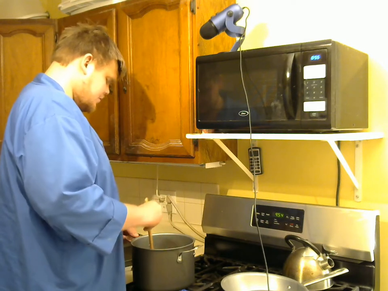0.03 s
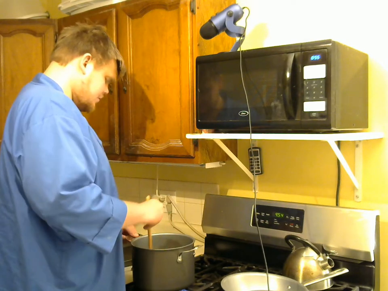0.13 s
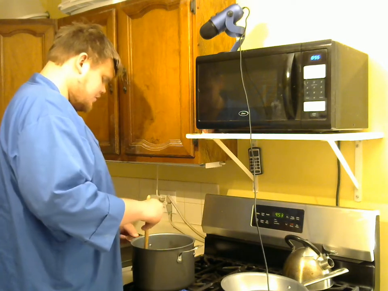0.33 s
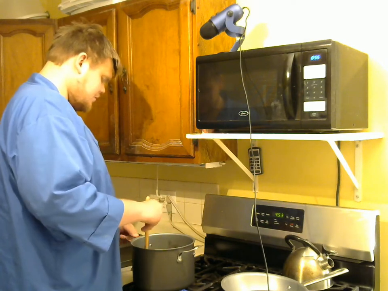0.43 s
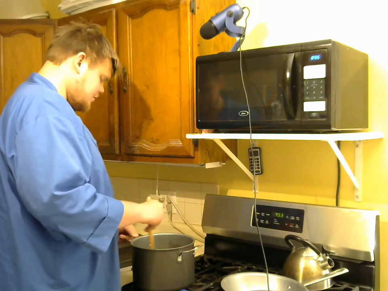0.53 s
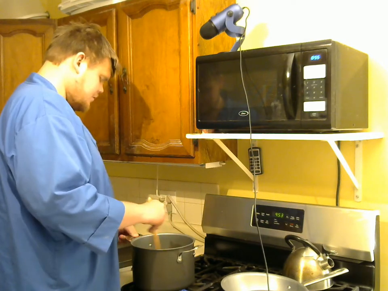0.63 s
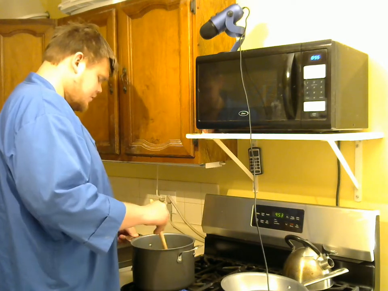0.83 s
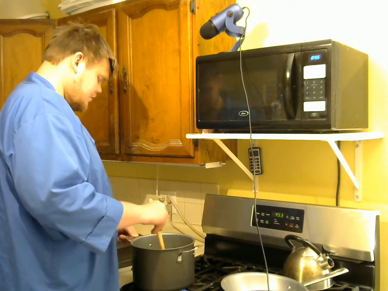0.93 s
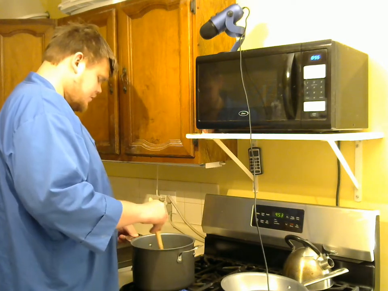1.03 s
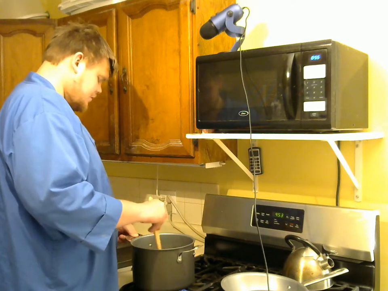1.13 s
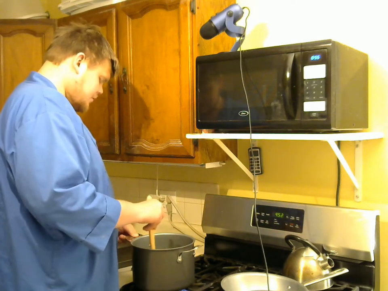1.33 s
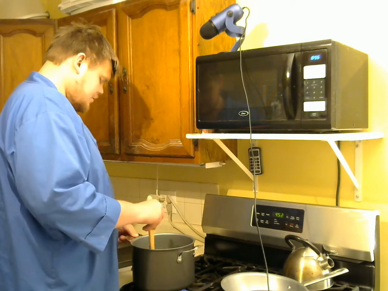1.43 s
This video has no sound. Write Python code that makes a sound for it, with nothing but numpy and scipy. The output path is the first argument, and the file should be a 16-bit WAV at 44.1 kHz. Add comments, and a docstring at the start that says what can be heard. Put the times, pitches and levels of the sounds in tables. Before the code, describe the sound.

One sharp ringing spoon knock on a pot, followed by hollow, juddering stirring scrapes in a kitchen

```python
"""A low hum is heard first, then one hard knock of a wooden spoon on a metal pot, with two softer knocks later.
Decaying tones ring the pot, and noise adds a crack and a clatter. The dragged spoon judders in hollow bumps
while random clicks, filtered and echoed, make it rub, churn and sing. Small wet ticks and grit are shaped noise.
Hard kitchen walls add a short tail; wavering appliance hums, a low tone and soft air noise lie underneath."""
import sys
import numpy as np
from scipy import signal
from scipy.fft import rfft, irfft
from scipy.io import wavfile
from scipy.ndimage import uniform_filter1d

SR = 44100
rng = np.random.default_rng(int(sys.argv[2]) if len(sys.argv) > 2 else 0)


def waveform_to_disk(signal):
    """Save audio, clipped to [-1, 1], as 16-bit WAV at the path in sys.argv[1]."""
    frames = np.transpose(np.atleast_2d(signal))
    scaled = np.clip(frames, -1, 1) * 32767
    samples = np.round(scaled).astype(np.int16)
    wavfile.write(sys.argv[1], SR, samples)


N = 66150
T = np.arange(N) / SR  # time of each sample, in seconds

# Tone colour of the wet ticks and the grit: pitch_hz, density_db [dB per Hz, relative]
TICK_COLOUR = [(500, 6), (2000, -7.5), (3800, 1), (5000, -4), (7600, 1), (10000, -10), (13000, -13),
               (15500, -14)]


def undb(db):
    """Turn decibels into a gain."""
    return 10 ** (np.asarray(db) / 20)


def unit(x):
    """Scale a sound to an average (rms) level of 1."""
    return x / np.sqrt(np.mean(x ** 2))


def curve(rows, axis=1):
    """Join one column of a table by straight lines in time."""
    rows = np.array(rows)
    return np.interp(T, rows[:, 0], rows[:, axis])


def noise():
    """White noise: independent random samples."""
    return rng.standard_normal(N)


def colour(x, points):
    """Weight the frequencies of a sound by (Hz, dB) points, then scale it to rms 1."""
    hz, db = np.array(points).T
    f = np.maximum(np.fft.rfftfreq(N, 1 / SR), 1)
    gain = undb(np.interp(np.log(f), np.log(hz), db))
    return unit(irfft(rfft(x) * gain, N))


def fade(start, t60, rise=0.00034):
    """Rise quickly at the start, then die away by 60 dB every t60 seconds."""
    age = np.maximum(T - start, 0)
    return (1 - np.exp(-age / rise)) * np.exp(-np.log(1000) * age / t60)


def walk(rate):
    """Noise smoothed twice into a slow random drift of rms 1."""
    k = int(SR / rate)
    smooth = uniform_filter1d(noise(), k, mode="wrap")
    return unit(uniform_filter1d(smooth, k, mode="wrap"))


def kitchen(x, wet_db):
    """Direct sound plus a dense, short tail of reflections from the walls."""
    gap_s, room_t60_s = 0.00408, 0.23
    tail = noise() * fade(gap_s, room_t60_s)
    tail = tail / np.linalg.norm(tail)
    return x + undb(wet_db) * signal.fftconvolve(x, tail)[:N]


def slips():
    """The spoon sticks and slips: dense random clicks of uneven size and either sign."""
    slips_per_s, scatter_db = 1500, 2
    happens = rng.random(N) < slips_per_s / SR
    size = undb(scatter_db * np.minimum(rng.exponential(size=N), 4))
    return happens * rng.choice([-1, 1], N) * size


def ringing(hz, width_hz):
    """Slips drive a resonance whose centre follows a pitch curve; rms 1."""
    turn = np.exp(2j * np.pi * np.cumsum(hz) / SR)
    lowpass = signal.butter(2, width_hz / 2, fs=SR, output="sos")
    # Shift the moving centre down to 0 Hz, filter there, and shift back.
    return unit((signal.sosfilt(lowpass, slips() / turn) * turn).real)


def knocks():
    """Each blow cracks, rings the pot and leaves a clatter around its ringing pitches that loses treble first."""
    # Blows of the spoon on the wall: start_s, level_db, corner_hz [brightness of the contact],
    # clatter_db [relative to the blow], free [share of the ring time left by the resting spoon]
    blows = [(0.2058, -0.5, 9100, -13.5, 0.95), (0.9937, -17.5, 1980, -18, 0.79),
             (1.1622, -27, 3000, -17, 0.43)]
    # Ringing pitches (modes) of the pot: pitch_hz
    pot_hz = [328, 1075, 1174, 1547, 1612, 1640, 1810, 2000, 2227, 2334, 2524, 2866, 3095, 3176, 3496, 3563,
              3885, 4140, 5045, 5749, 6944]
    # How each mode rings: level_db [relative to the blow], t60_s [before the spoon shortens it]
    pot_ring = [(-33, 0.55), (-17, 0.053), (-22, 0.46), (-28, 0.25), (-20, 0.47), (-6.5, 0.12), (-33, 0.57),
                (-12, 0.054), (-16, 0.27), (-28, 0.34), (-19.5, 0.17), (-29, 0.55), (-18.5, 0.13),
                (-27, 0.47), (-36, 0.44), (-26.5, 0.39), (-23.5, 0.3), (-36, 0.65), (-27.5, 0.36),
                (-33.5, 0.41), (-25, 0.16)]
    # Colour of the spoon, pot and grate clattering: pitch_hz, density_db [dB per Hz, relative]
    clatter_colour = [(100, -42), (230, -23), (390, 0), (480, -9), (580, -3), (720, -11), (950, 0.5),
                      (1100, -7.5), (1350, -8.5), (1650, -1.5), (3100, -1.5), (4400, -9), (5100, -6.5),
                      (6200, -11.5), (6900, -12), (7700, -16), (8100, -9.5), (8500, -15), (9300, -17.5),
                      (10100, -24), (10600, -16), (11300, -30), (12500, -29), (15500, -37)]
    crack_db, crack_t60_s = -12.5, 0.026
    clatter_t60_s, bloom_s, treble_loss_per_hz = 0.38, 0.004, 0.00002  # fade before treble loss; rise time
    width_at_1khz_hz, plain_db = 50, -3.5  # width of the clatter peaks; level of the even part under them

    f = np.fft.rfftfreq(N, 1 / SR)
    edges = np.geomspace(60, 16000, 9)  # eight bands, in Hz
    peaks = []
    for hz in pot_hz:
        width_hz = width_at_1khz_hz * np.sqrt(hz / 1000)
        peaks.append(1 / (1 + (2 * (f - hz) / width_hz) ** 2))
    near_modes = undb(plain_db) + np.max(peaks, axis=0)

    out = 0
    for start, db, corner_hz, clatter_db, free in blows:
        ring = 0
        for hz, (mode_db, t60) in zip(pot_hz, pot_ring):
            tone = np.sin(2 * np.pi * (hz * (T - start) + rng.random()))
            ring = ring + undb(mode_db) * fade(start, t60 * free) * tone
        crack = undb(crack_db) * colour(noise(), clatter_colour) * fade(start, crack_t60_s)
        # A lower corner dulls the contact.
        blow = signal.lfilter(*signal.butter(2, corner_hz, fs=SR), ring + crack)

        gathered = irfft(rfft(noise()) * near_modes, N)
        spectrum = rfft(colour(gathered, clatter_colour))
        for lo, hi in zip(edges, edges[1:]):
            band = irfft(spectrum * ((f >= lo) & (f < hi)), N)
            band_t60_s = clatter_t60_s / (1 + treble_loss_per_hz * lo)
            blow = blow + undb(clatter_db) * band * fade(start, band_t60_s, bloom_s)
        out = out + undb(db) * blow
    return out


def bumps():
    """The dragged spoon catches and lets go: short, hollow, damped tones."""
    # Bumps of the spoon: start_s, pitch_hz, level_db [before the doubling below]
    bump_table = [(0.415, 476, -37), (0.460, 470, -29), (0.494, 467, -24.5), (0.534, 439, -28),
                  (0.556, 438, -42), (0.576, 401, -30.5), (0.620, 388, -24), (0.658, 557, -23.5),
                  (0.688, 538, -27.5), (0.714, 497, -12), (0.738, 505, -23), (0.778, 532, -26.5),
                  (0.8, 484, -29.5), (0.909, 480, -25), (1.171, 470, -32), (1.254, 413, -30),
                  (1.322, 408, -27.5), (1.343, 379, -29), (1.383, 393, -31.5), (1.413, 405, -34.5)]
    rise_s, t60_s, room_db = 0.0062, 0.066, -10
    bumping = 0
    for start, hz, db in bump_table:
        tone = np.sin(2 * np.pi * hz * (T - start))
        bumping = bumping + undb(db) * fade(start, t60_s, rise_s) * tone
    return kitchen(2 * bumping, room_db)


def rubbing():
    """Slips rasp broadly as the wood drags along the metal."""
    # Strength of the rubbing: time_s, level_db
    rub_level = [(0, -61), (0.40, -82), (0.49, -44.5), (0.56, -44), (0.68, -37.5), (0.77, -41.5),
                 (0.87, -41.5), (0.96, -41.5), (1.04, -40), (1.13, -43), (1.18, -40.5), (1.24, -50),
                 (1.31, -44), (1.40, -51.5), (1.5, -60)]
    # Colour of wood on metal: pitch_hz, density_db [dB per Hz, relative]
    rub_colour = [(250, -12), (480, 8.5), (700, 1), (860, -1), (1080, 8), (1450, 5), (1630, 4.5), (1780, 3),
                  (1950, 4.5), (2130, -1.5), (2340, 0), (2480, -4.5), (2850, 2.5), (3250, -5), (3600, -4.5),
                  (4200, -6.5), (4800, -12.5), (5650, -3.5), (6150, -9), (6700, -6), (7650, -5.5),
                  (8400, -18), (9200, -12), (10300, -25), (11200, -15.5), (11700, -23), (12200, -16),
                  (13000, -26), (15500, -33)]
    room_db = 1
    rasp = kitchen(colour(slips(), rub_colour), room_db)
    return undb(curve(rub_level)) * unit(rasp)


def singing():
    """The rubbed wall half sings: a rough tone with a noisy octave above it."""
    # The singing of the wall: time_s, level_db, pitch_hz
    song = [(0, -56.5, 1301), (0.2, -63.5, 1305), (0.4, -64, 1100), (0.55, -51, 1075), (0.71, -40.5, 1078),
            (0.77, -50, 1200), (0.82, -47, 1285), (0.99, -39, 1312), (1.12, -47, 1305), (1.3, -48.5, 1305),
            (1.38, -86, 1305), (1.5, -87, 1305)]
    width_hz, clean_db = 84, -5
    overtone_width_hz, overtone_db = 420, -9
    hz = curve(song, axis=2)
    phase_waver = 0.37 * walk(17)  # radians
    clean = unit(np.sin(2 * np.pi * np.cumsum(hz) / SR + phase_waver))
    tone = unit(ringing(hz, width_hz) + undb(clean_db) * clean)
    overtone = undb(overtone_db) * ringing(2 * hz, overtone_width_hz)
    return undb(curve(song)) * (tone + overtone)


def churning():
    """Slips drive two hollow resonances that rise and fall as the spoon goes round."""
    # Low churning in the pot: time_s, level_db, centre_hz
    churn = [(0, -53.5, 414), (0.39, -48.5, 442), (0.5, -38, 441), (0.62, -37, 450), (0.69, -34.5, 463),
             (0.8, -40.5, 454), (0.95, -43.5, 444), (1.1, -49, 452), (1.22, -46, 450), (1.34, -44.5, 430),
             (1.5, -48, 430)]
    # Higher resonance that rises through the first stroke: time_s, level_db, centre_hz
    glide = [(0.42, -73, 635), (0.5, -49.5, 678), (0.57, -47.5, 710), (0.63, -46, 734), (0.7, -52.5, 757),
             (0.78, -68, 780), (1.5, -80, 764)]
    churn_width_hz, glide_width_hz = 171, 49
    low = undb(curve(churn)) * ringing(curve(churn, axis=2), churn_width_hz)
    high = undb(curve(glide)) * ringing(curve(glide, axis=2), glide_width_hz)
    return low + high


def ticks():
    """Bright wet ticks from the food: short noise bursts, each with a hissing tail in the room."""
    # Wet ticks: start_s, level_db
    tick_table = [(0.417, -33), (0.4952, -34), (0.5334, -34.5), (0.576, -38.5), (0.655, -41.5),
                  (0.8535, -41), (1.1636, -41), (1.2974, -50.5), (1.3816, -47.5), (1.4345, -45)]
    t60_s, tail_db, tail_t60_s = 0.013, -5, 0.31
    power = 0
    for start, db in tick_table:
        burst = fade(start, t60_s)
        tail = undb(tail_db) * fade(start, tail_t60_s)
        power = power + undb(db) ** 2 * (burst ** 2 + tail ** 2)
    return np.sqrt(power) * colour(noise(), TICK_COLOUR)


def grit():
    """Sparse random crackles where the spoon first drags through the food."""
    # Strength of the fine grit under the spoon: time_s, level_db
    grit_level = [(0.38, -91), (0.43, -63), (0.48, -70), (0.52, -48), (0.6, -52), (0.69, -58), (0.76, -58),
                  (1.15, -85), (1.5, -76)]
    grains_per_s, room_db = 240, -15
    grains = (rng.random(N) < grains_per_s / SR) * noise()
    crackle = kitchen(colour(grains, TICK_COLOUR), room_db)
    return undb(curve(grit_level)) * unit(crackle)


def wavering_tone(hz):
    """A steady pitch whose phase drifts a little; rms 1."""
    phase_waver = 0.35 * walk(9)  # radians
    return unit(np.sin(2 * np.pi * (hz * T + rng.random()) + phase_waver))


def background():
    """Wavering appliance hums and a low tone that comes and goes, over a soft rush of air."""
    # Appliance hums: pitch_hz, level_db, waver_db [typical size of the level drift]
    hums = [(59.5, -54.5, 0.5), (151.3, -56, 3)]
    # Strength of the low tone: time_s, level_db
    drone = [(0, -32.5), (0.07, -51), (0.12, -40), (0.19, -50), (0.37, -48), (0.47, -70), (0.62, -35.5),
             (0.74, -50.5), (0.85, -45.5), (1.0, -45.5), (1.07, -87), (1.25, -55), (1.32, -42),
             (1.5, -48.5)]
    # Colour of the rush of air: pitch_hz, density_db [dB per Hz, relative]
    air_colour = [(25, -8.5), (90, -11), (130, -4), (180, -6.5), (260, 2), (400, -9), (600, -15),
                  (1050, -18.5), (1300, -25.5), (1900, -31.5), (3000, -27.5), (4700, -36), (6800, -32.5),
                  (10000, -38.5), (15500, -46)]
    drone_hz, air_db = 327.4, -45
    hum = 0
    for hz, db, waver_db in hums:
        hum = hum + undb(db + waver_db * walk(12)) * wavering_tone(hz)
    low_tone = undb(curve(drone)) * wavering_tone(drone_hz)
    air = undb(air_db) * colour(noise(), air_colour)
    return hum + low_tone + air


def scene():
    """Add everything as heard at one microphone above the stove."""
    spoon = knocks() + bumps() + rubbing() + singing() + churning()
    food = ticks() + grit()
    return (spoon + food + background())[None]


def record(dry):
    """The recorder clips at full scale and cuts the top of the treble."""
    top_hz = 15700
    lowpass = signal.ellip(12, .2, 80, top_hz, fs=SR, output="sos")
    return signal.sosfilt(lowpass, np.clip(dry, -1, 1))


dry = scene()
out = record(dry)
waveform_to_disk(out)
```